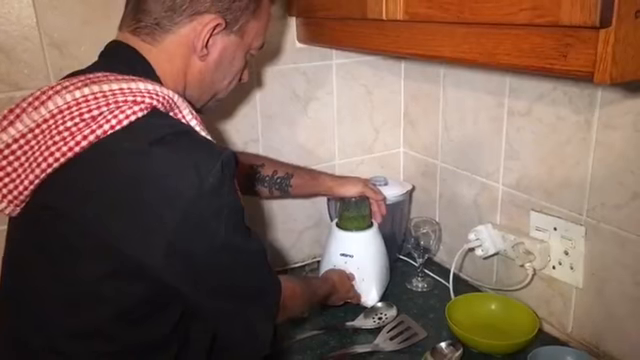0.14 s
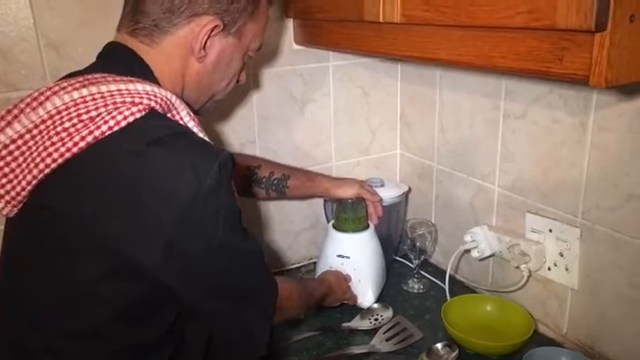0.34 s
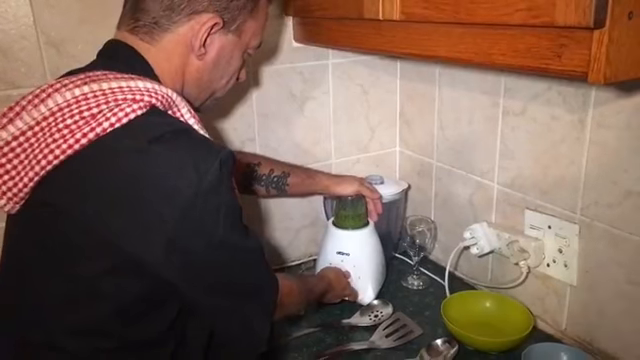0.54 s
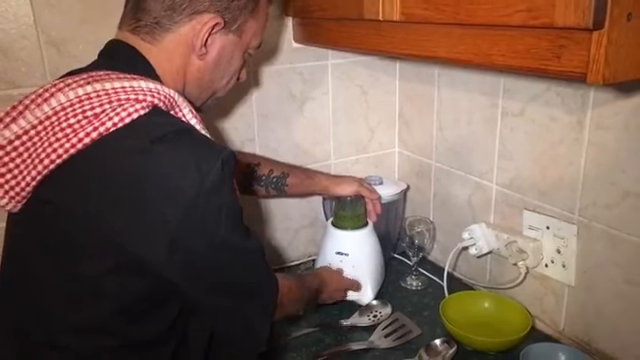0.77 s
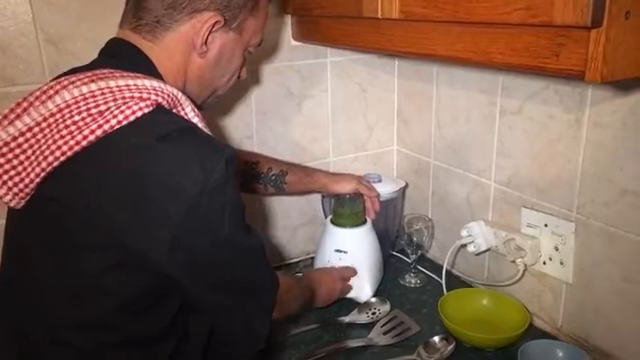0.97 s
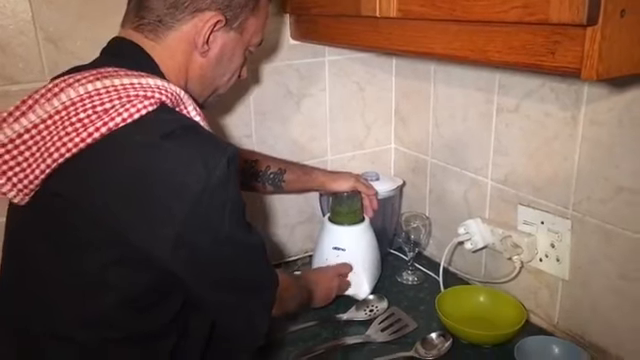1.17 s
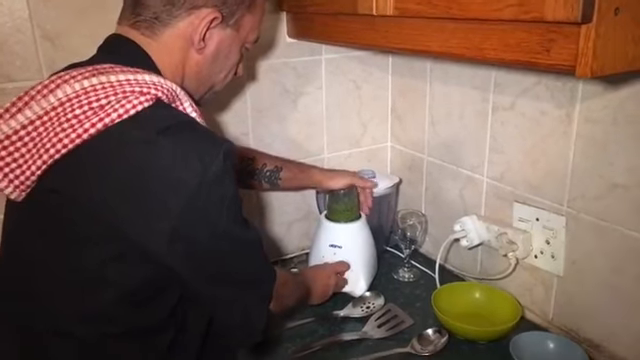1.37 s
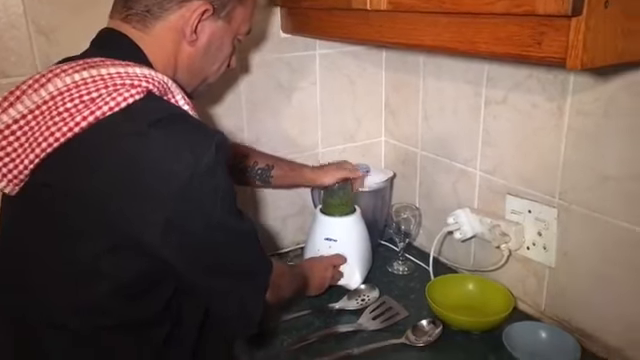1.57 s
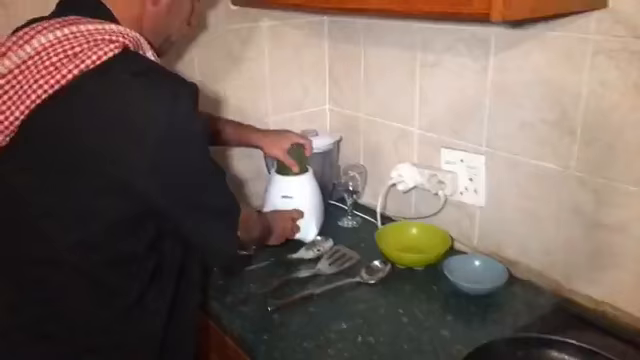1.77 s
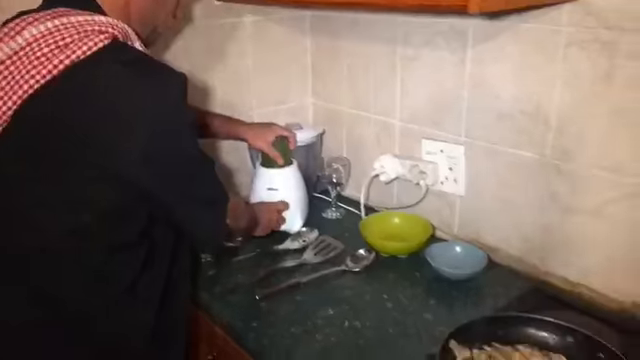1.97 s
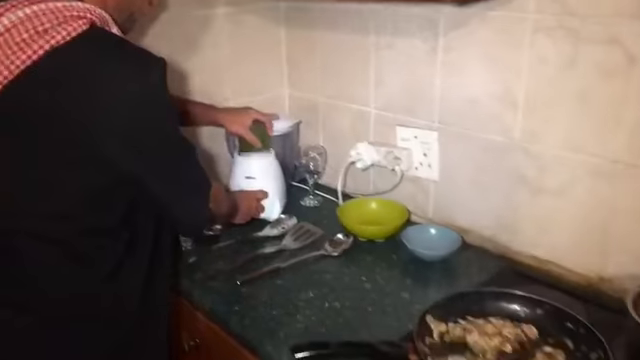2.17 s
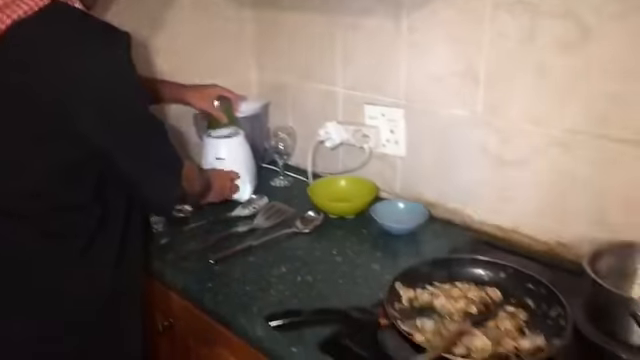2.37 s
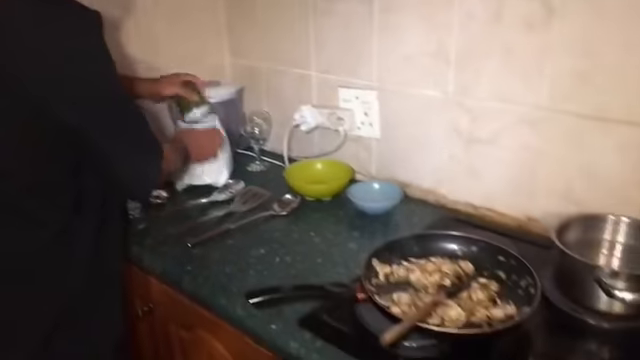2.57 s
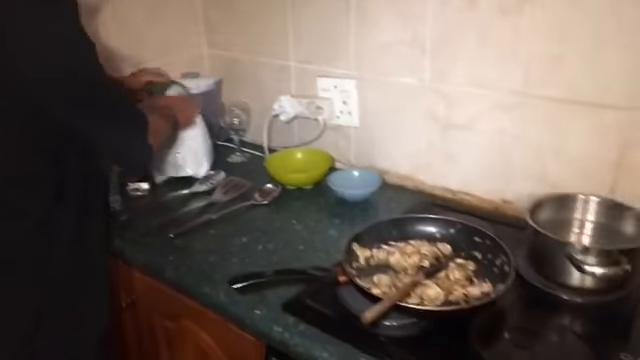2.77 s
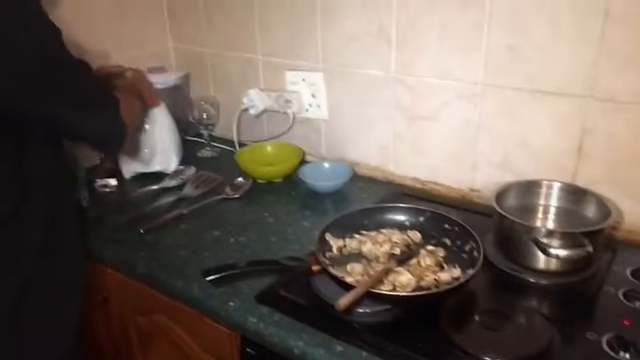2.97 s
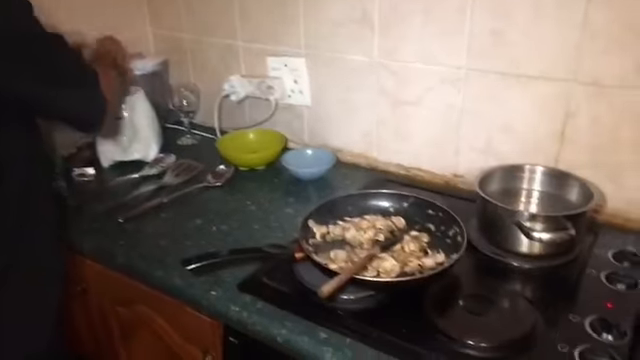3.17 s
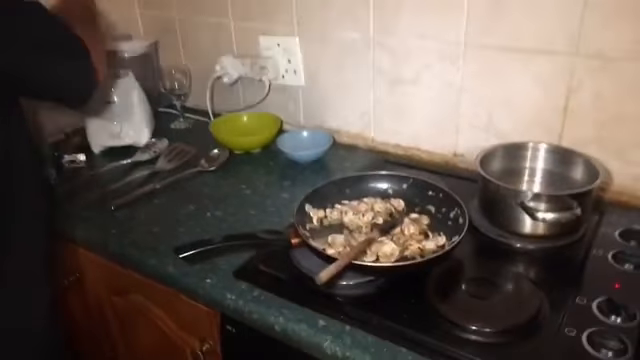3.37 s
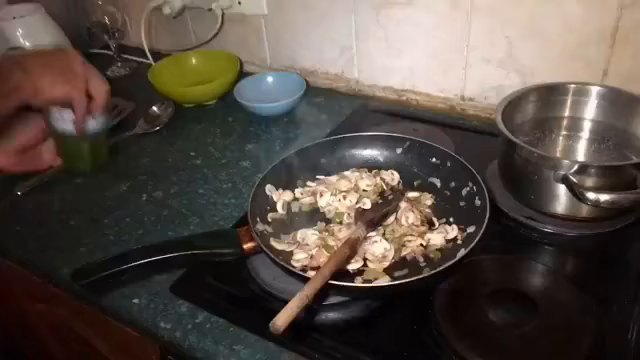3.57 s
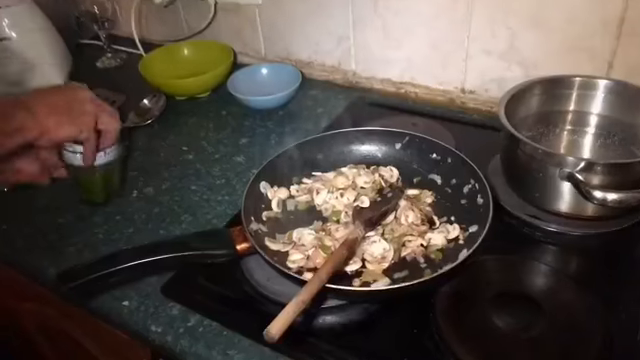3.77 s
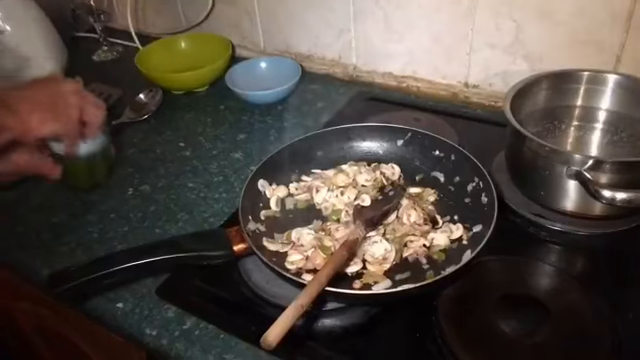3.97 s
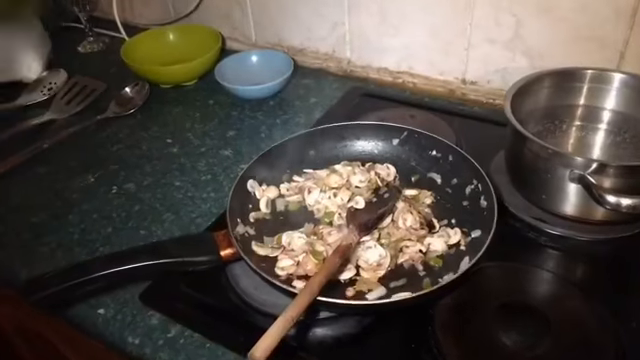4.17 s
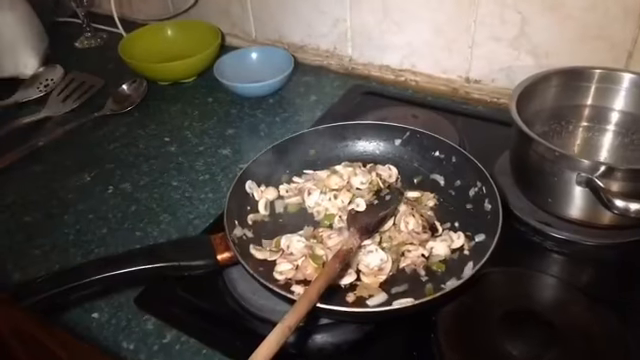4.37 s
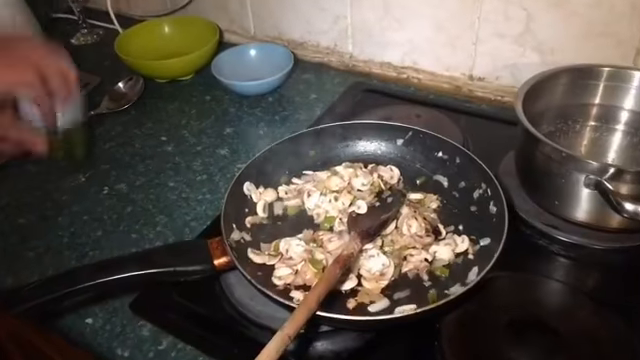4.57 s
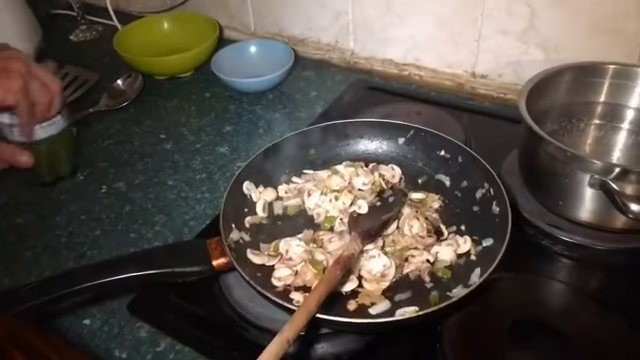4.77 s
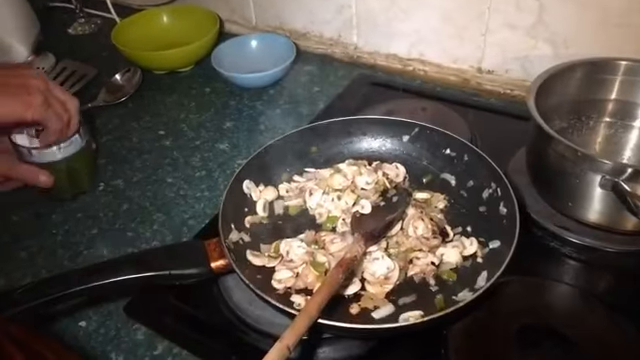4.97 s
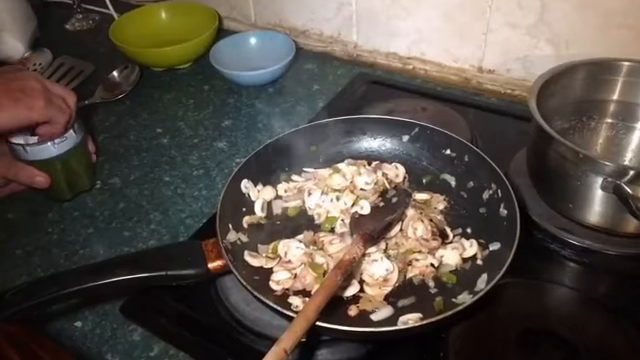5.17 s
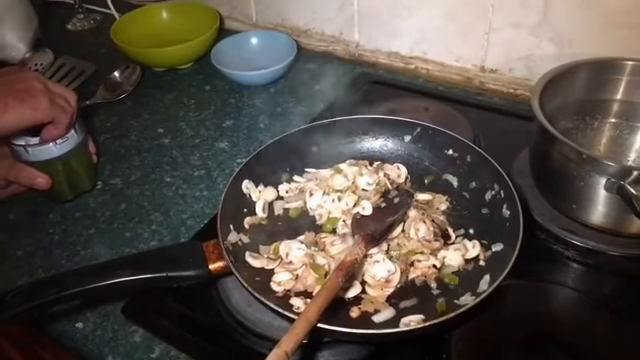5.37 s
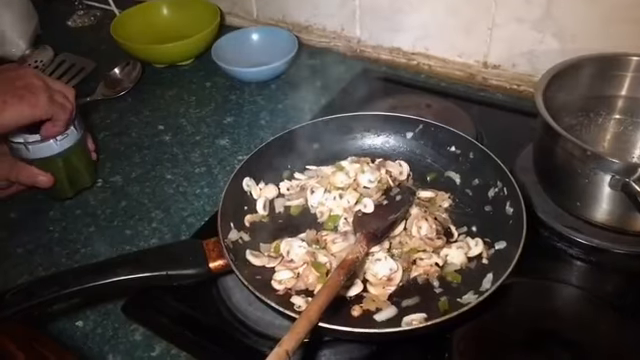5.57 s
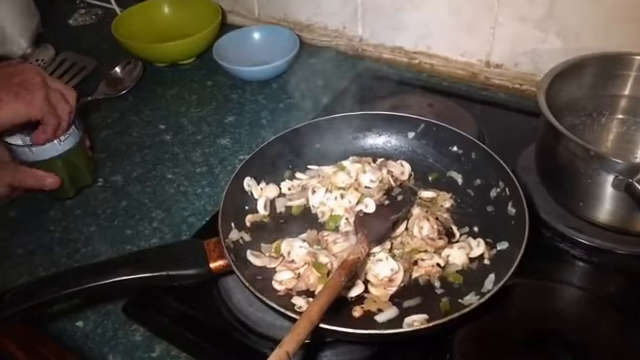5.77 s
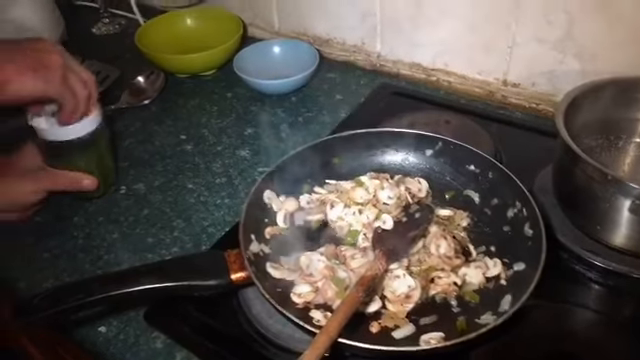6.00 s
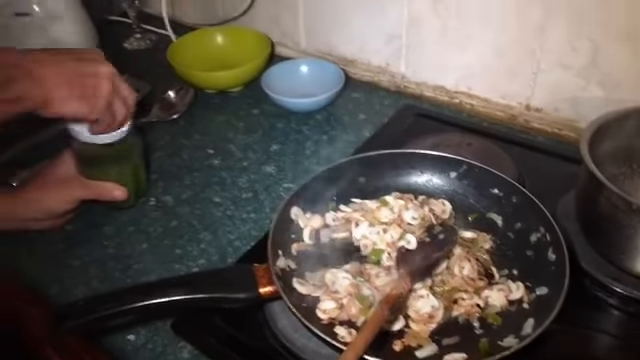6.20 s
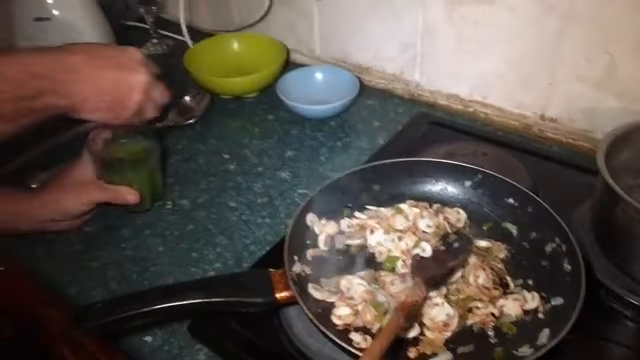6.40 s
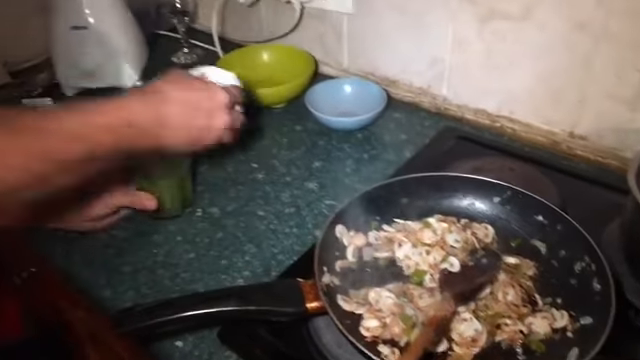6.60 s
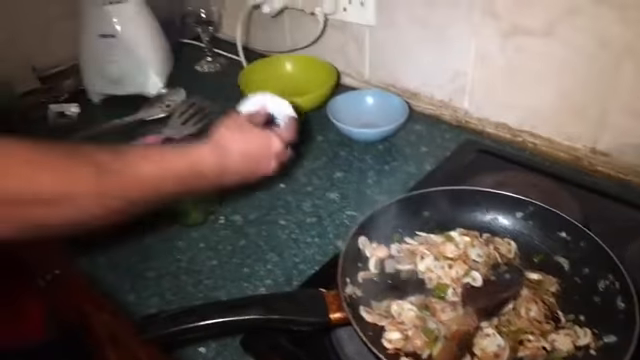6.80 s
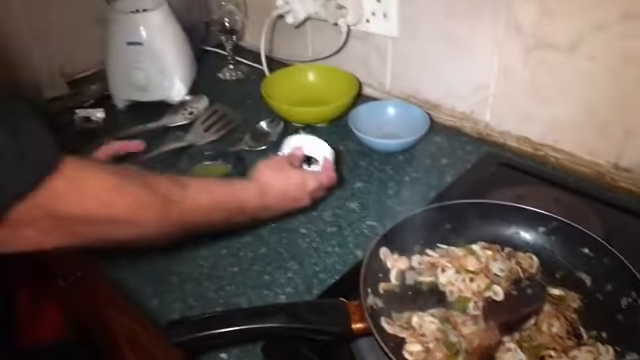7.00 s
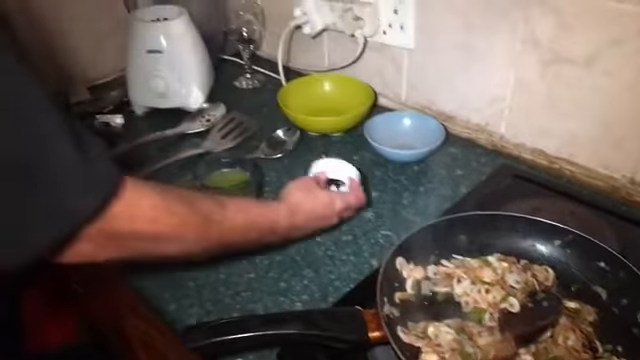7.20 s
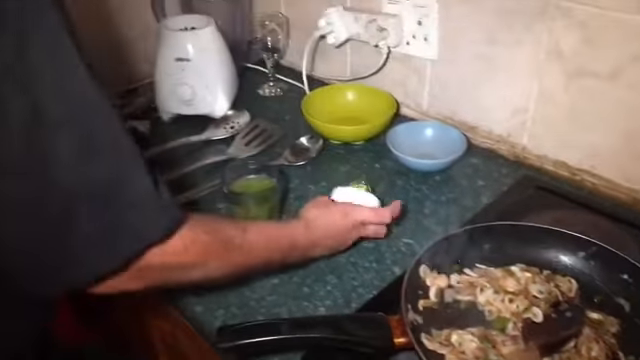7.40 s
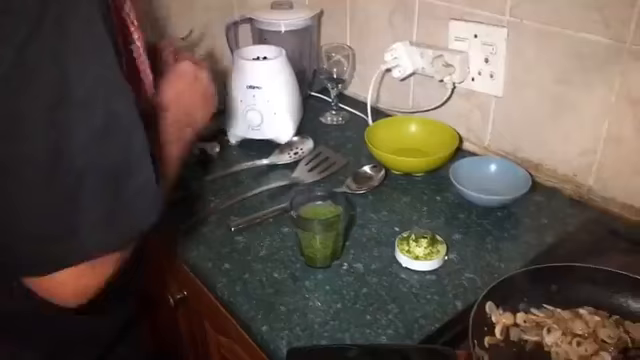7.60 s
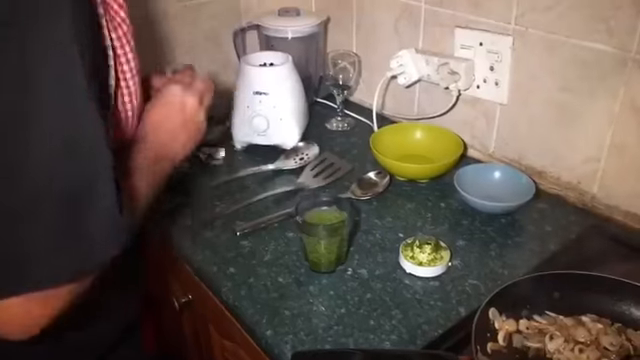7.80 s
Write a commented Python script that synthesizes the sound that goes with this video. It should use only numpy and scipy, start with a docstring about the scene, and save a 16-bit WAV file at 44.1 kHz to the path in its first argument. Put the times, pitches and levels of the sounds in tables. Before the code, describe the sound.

In a tiled home kitchen, a small blender winds down in the first second, its hum sinking under rough slurry noise. Soft steady frying and faint mains hum remain. Light plastic taps follow, then two jar knocks on the stone counter, cap creaks, a sharp metallic jangle as the cap comes off, and a final plastic tap. A handheld microphone rumbles and bumps throughout.

```python
"""Blender stopping in a kitchen

A small blender coasts to a stop on a stone counter: a slowing hum under the roar of knocked slurry.
Food sizzles softly in a pan as dense grains melted into noise, over room tone and a faint mains hum.
A glass jar lands as struck modes, plastic parts tap as its cap is unscrewed, and its steel blades jangle
as ticks and pings. A hand-held camera with one microphone rumbles as it is moved: low noise and bumps."""
import sys
import numpy as np
from scipy import signal
from scipy.fft import rfft, irfft
from scipy.io import wavfile
from scipy.ndimage import uniform_filter1d

SR = 44100
rng = np.random.default_rng(int(sys.argv[2]) if len(sys.argv) > 2 else 0)


def master(y):
    """Save y as 16-bit WAV."""
    cut = np.clip(np.atleast_2d(y).T, -1, 1)
    pcm = np.round(cut * 32767)  # scale
    wavfile.write(sys.argv[1], SR, pcm.astype(np.int16))


def rack_gain(trim_db):
    """Turn a fader trim in dB into the linear factor to multiply a signal by."""
    fader = np.asarray(trim_db, float)
    return 10 ** (fader / 20)


N = 346185
T = np.arange(N) / SR

# Spectrum of the room tone. Each row: frequency in Hz, relative density in dB per Hz.
ROOM_TONE_SPECTRUM = [(15, -37), (25, 9), (54, -8.5), (106, -27), (124, -55), (155, -17), (174, -38),
                      (250, -7), (381, -14), (536, -9.5), (3000, -28), (3900, -46), (6600, -120)]
# Appliance hum. Each row: frequency in Hz, mean level in dB.
HUM_TONES = [(50, -68), (100, -62), (150.5, -67.5), (260, -70.5), (300, -75), (436, -67)]
# Camera moved in the hand. Each row: middle in seconds, half length in seconds, sway level in dB,
# quickness as the dB gained from sway to thump.
CAMERA_MOVES = [(0, 0.049, -27, 3.5), (0.188, 0.056, -35, 5.5), (0.292, 0.046, -40, 0.5),
                (.42, .06, -47, -4), (0.106, 0.037, -51.5, 17.5), (.52, 0.026, -56, 7.5),
                (0.647, 0.17, -50, 4), (0.92, 0.047, -59, 6), (1.377, 0.053, -45, -16),
                (1.943, 0.1, -67, -5), (2.21, 0.052, -61, -2), (2.495, 0.048, -50, 1),
                (2.577, 0.033, -43.5, -4), (2.72, 0.067, -45, 0), (2.803, 0.049, -41, -5),
                (2.902, 0.074, -34.5, -3.5), (3.03, 0.03, -43, -1.5), (3.154, 0.036, -46, -13),
                (3.293, 0.028, -39, -11.5), (3.536, 0.018, -39.5, -2), (3.703, .04, -49, 3),
                (3.76, .04, -44, -9), (3.85, .06, -31, -30), (4.029, 0.023, -59, 17.5),
                (4.28, 0.13, -53, -4), (4.513, 0.012, -42, -1), (4.65, 0.048, -38, 7.5),
                (4.764, 0.091, -33, 8), (4.852, 0.037, -26, -13), (4.915, 0.059, -40.5, 10.5),
                (5.016, 0.047, -35.5, 3.5), (5.22, 0.036, -46, -8), (5.31, .04, -45.5, -2),
                (6.228, 0.019, -52.5, 16), (6.284, 0.042, -58, 9), (6.772, 0.039, -37, -14),
                (7.11, 0.041, -42.5, -13), (7.258, 0.038, -33.5, -9), (7.316, 0.023, -30.5, -25),
                (7.4, 0.047, -42.5, -14), (7.584, .04, -50, -5), (7.721, 0.025, -32, -8),
                (7.788, 0.032, -40, 5), (7.85, 0.016, -36, 7.5)]
# A camera held still. The entries: mean sway, thump and flutter levels in dB.
STILL_HAND_DB = -56.5, -62, -65.5
# Bumps of the camera body. Each row: start in seconds, level in dB, starting pitch in Hz, t60 in seconds.
CAMERA_BUMPS = [(2.361, -18.5, 91, 0.15), (6.219, -37.5, 160, 0.13), (6.669, -12.5, 91.5, 0.2)]
# Frying as the microphone wanders nearer and away. Each row: time in seconds, level in dB.
SIZZLE_LEVEL = [(1, -48.5), (2.8, -49.5), (3.65, -48.5), (4.13, -46.5), (4.45, -48), (4.85, -47.5),
                (6.2, -47), (7.0, -48.5), (7.85, -46.5)]
# Spectrum of the frying. Each row: frequency in Hz, relative density in dB per Hz.
PAN_SPECTRUM = [(710, -19), (1200, -10), (1380, -19), (1890, -15), (3110, -14), (3580, -10.5), (4030, -9.5),
                (5450, -7.5), (8780, -1), (10400, -2.5), (12000, -2.5), (15100, -7), (15900, -8)]
# Loudest spits of fat. Each row: start in seconds, starting level in dB, centre in Hz.
FAT_SPITS = [(2.285, -51, 4530), (2.507, -57, 4000), (3.824, -47, 4030), (7.118, -44, 9000),
             (7.198, -36, 10700), (7.207, -42, 8800), (7.295, -40.5, 4940), (7.304, -51, 3470)]
# Plastic parts tapping and creaking. Each row: start in seconds, level in dB, pitch in Hz,
# t60 of the ring in seconds, rough part in dB.
PLASTIC_TAPS = [(.515, -35, 802, 0.14, -2), (1.42, -42, 310, 0.076, 2.5), (1.549, -44, 330, 0.067, -15),
                (1.685, -44, 315, 0.19, -10), (1.849, -42.5, 322, 0.1, -1), (1.866, -53.5, 1150, 0.15, 13),
                (1.872, -51, 2383, 0.13, 8), (2.791, -52.5, 1800, 0.017, 6), (3.548, -49, 883, 0.083, -2),
                (5.205, -45, 664, 0.066, -18), (5.262, -32.5, 766, 0.13, -15), (5.28, -37, 730, .05, -8),
                (5.312, -46, 1530, 0.12, -4), (5.33, -31.5, 845, 0.064, -17),
                (5.332, -40, 1123, 0.063, -18), (5.336, -33, 550, 0.04, -3.5),
                (5.365, -40.5, 880, 0.11, -5), (5.4, -57, 1600, 0.22, -6), (5.63, -50.5, 424, 0.6, -8),
                (6.213, -42.5, 4020, 0.036, 0), (6.216, -51, 1100, .06, 4), (6.255, -56, 1200, .2, 1),
                (6.615, -35.5, 916, 0.037, -12), (6.668, -32, 494, 0.023, 7), (6.69, -28, 725, 0.058, 3),
                (6.716, -33, 2340, 0.037, 2), (7.836, -22, 877, 0.025, -10.5)]
# Hard edges clicking. Each row: start in seconds, level in dB.
EDGE_CLICKS = [(1.421, -35.5), (1.869, -52), (2.79, -42), (5.312, -33), (5.328, -27.5), (6.213, -39),
               (7.836, -37.5)]
# Jar set on the counter. Each row: start in seconds, level in dB, hardness as treble tilt in dB an octave,
# thud in dB, crack in dB.
JAR_KNOCKS = [(4.0035, -12, -12, -7.5, -17.5), (4.836, -10, -3, -6, -6.5)]
# Ringing modes of jar and counter. Each row: frequency in Hz, relative level in dB, t60 in seconds.
JAR_MODES = [(114, -1, 0.055), (537, -3.5, 0.028), (877, -11, 0.016), (1100, -6.5, 0.047),
             (1400, -7.5, 0.039), (1800, -31, 0.02), (2290, -5, 0.015), (2770, -23, 0.05), (3400, 3, 0.011),
             (4100, -30, 0.029)]
# The rim lands in several touches. Each row: delay in seconds, relative level in dB.
RIM_TOUCHES = [(0, -35), (.0019, -5.5), (.0038, 3.5), (.0075, -19)]
# Spectrum of the jangling steel. Each row: frequency in Hz, relative density in dB per Hz.
STEEL_SPECTRUM = [(1760, -55), (3000, -21.5), (5700, -10.5), (6650, -4.5), (8610, -4.5), (8910, -3.5),
                  (10500, -7.5), (12000, -2.5), (14800, -2), (15900, -4)]
# Blades shaken in the cap. Each row: peak in seconds, level in dB, rise in dB per second,
# fall in dB per second.
BLADE_SHAKES = [(6.671, -14.5, 1350, 450), (6.715, -26.5, 600, 102), (6.77, -25.5, 800, 152)]
# Clear pings of the blades. Each row: start in seconds, mean level in dB, pitch in Hz, t60 in seconds.
BLADE_PINGS = [(6.655, -32, 9500, .06), (6.67, -22, 9240, .05), (6.676, -20.5, 7660, 0.083),
               (6.678, -22, 14500, .12), (6.686, -25, 9200, .1), (6.767, -23, 6690, 0.084),
               (6.767, -24.5, 9950, 0.089), (6.785, -21, 12500, .06), (6.788, -25, 9160, 0.11),
               (6.788, -33, 8300, .12), (6.812, -26, 9220, .08)]
# Blender coasting. Each row: time in seconds, shaft speed in Hz.
SHAFT_SPEED = [(0, 214), (.18, 165), (.3, 145.2), (.53, 101.2), (.78, 80.1), (1.05, 51.2)]
# Modes of the blender housing. Each row: frequency in Hz, width in Hz, relative level in dB at full speed.
HOUSING_MODES = [(770, 150, -5.5), (845, 31, -5.5), (1100, 510, -3.5), (1900, 37, -5.5), (2113, 106, 5.5),
                 (2400, 85, 0), (2860, 66, -6.5), (4000, 130, -4), (4960, 49, -12), (6370, 140, -6)]
# Spectrum of the roar. Each row: frequency in Hz, relative density in dB per Hz.
ROAR_SPECTRUM = [(88, -34), (150, -14), (314, 5.5), (384, -26), (614, -28), (728, 3), (1360, -5),
                 (2060, -21), (4500, -27), (5850, -52), (9900, -120)]
# Spectrum of the spinning blades' hiss. Each row: frequency in Hz, relative density in dB per Hz.
HISS_SPECTRUM = [(1760, -13), (3000, -3.5), (3310, -3.5), (3940, -2.5), (4690, -3.5), (5100, 0.5),
                 (7430, 1.5), (13600, -6.5), (15900, -9)]
# Lumps caught by the blades. Each row: middle of the surge in seconds, surge in dB.
CAUGHT_LUMPS = [(.01, 0), (.07, 3.5), (.157, 3), (.212, 2), (0.278, 4.5), (.362, 5), (.452, 4),
                (0.529, 10.5), (0.621, 6.5), (.697, 8), (.777, 7), (.85, 0), (.92, 0)]
# Steady offset of the converter. Each row: one channel, as a fraction of full scale.
CONVERTER_OFFSET = [
    [-.0071],
    [-.0088],
]


def noise():
    """White noise of rms 1."""
    return rng.standard_normal(N)


def level(x, db):
    """Scale to an rms level in dB."""
    return x * rack_gain(db) / np.sqrt(np.mean(x ** 2))


def curve(table):
    """Join (seconds, value) rows by straight lines, at every sample."""
    s, value = np.transpose(table)
    return np.interp(T, s, value)


def colour(x, points):
    """Shape by (Hz, dB) points, straight over log frequency; rms 1."""
    hz, db = np.transpose(points)
    f = np.maximum(np.fft.rfftfreq(N, 1 / SR), 1)
    gain_db = np.interp(np.log(f), np.log(hz), db, left=-80, right=-80)
    return level(irfft(rfft(x) * rack_gain(gain_db), N), 0)


def band(x, lo_hz, hi_hz, order=2):
    """Butterworth band-pass."""
    edges_hz = [lo_hz, min(hi_hz, SR / 2.2)]
    return signal.sosfilt(signal.butter(order, edges_hz, "band", fs=SR, output="sos"), x)


def ring(x, hz, t60):
    """One mode; a unit blow rings with amplitude 1."""
    pole = np.exp(2j * np.pi * hz / SR - np.log(1000) / (max(t60, 1e-3) * SR))
    return signal.lfilter([1], [1, -pole], x).imag


def walk(rate):
    """Random levels, a new one every 1 / rate seconds, slewed between; rms 1."""
    k = int(SR / rate)
    held = np.repeat(rng.standard_normal(N // k + 1), k)
    return level(uniform_filter1d(held, k)[:N], 0)


def grains(rate, spread_db):
    """Scattered clicks of either sign, some much bigger than the rest."""
    hits = rng.random(N) < rate / SR
    size_db = spread_db * np.minimum(rng.exponential(size=N), 4)
    return hits * noise() * rack_gain(size_db)


def burst(s, t60):
    """An envelope that starts at s and dies away by 60 dB in t60 seconds."""
    return (T >= s) * np.exp(-np.log(1000) * np.maximum(T - s, 0) / max(t60, 1e-3))


def even(x, s):
    """Noise with its chance swells over s seconds ironed out; rms 1."""
    return level(x / np.sqrt(uniform_filter1d(x ** 2, int(s * SR)) + 1e-12), 0)


def swell(s, db, rise, fall):
    """A level that climbs to db at s and sinks again, straight in dB."""
    return rack_gain(db - np.where(T < s, rise * (s - T), fall * (T - s)))


def room(x):
    """A tiled kitchen's tail: band-limited noise dying away, begun 8 ms after the sound."""
    t60_s, tail_db = 0.47, -15
    t = T[:SR]
    tail = band(rng.standard_normal(SR), 670, 6000, order=1)
    tail = tail * np.exp(-np.log(1000) * t / t60_s) * (t > 0.008)
    return signal.fftconvolve(x, tail / np.sqrt(np.sum(tail ** 2)))[:N] * rack_gain(tail_db)


def kitchen():
    """Room tone as shaped noise, and appliance hum as sines wavering in level and phase."""
    hum = np.zeros(N)
    for hz, db in HUM_TONES:
        waver = (hz / 250) ** 2 * walk(20)  # radians, wider for higher tones
        hum += rack_gain(db + 1.9 * walk(6.9)) * np.sin(2 * np.pi * hz * T + waver)
    room_tone = colour(noise(), ROOM_TONE_SPECTRUM) * rack_gain(-57.5 + walk(5.17))
    return room_tone + np.sqrt(2) * hum


def handling():
    """Low buffeting and bumps straight into the microphone; quicker moves reach higher."""
    sway = even(band(noise(), 18.8, 40.1, order=3), 0.032)
    thump = even(band(noise(), 54.3, 95.3, order=2), 0.0325)
    flutter = even(band(band(noise(), 119, 169, order=1), 74, 343, order=3), 0.0272)
    gains = [rack_gain(db + 3.3 * walk(19)) for db in STILL_HAND_DB]
    for s, half, db, quick_db in CAMERA_MOVES:
        shape = np.exp(-((T - s) / half) ** 2)
        lifts_db = 0, quick_db, 1.8 * quick_db - 13.5  # quickness counts most in the flutter
        gains = [g + rack_gain(db + lift) * shape for g, lift in zip(gains, lifts_db)]
    out = sum(g * x for g, x in zip(gains, (sway, thump, flutter)))
    sag_s = 0.015  # the pitch of a bump has halved after this time
    for s, db, hz, t60 in CAMERA_BUMPS:
        phase = 2 * np.pi * hz * sag_s * np.log1p(np.maximum(T - s, 0) / sag_s)
        onset = np.clip(0.57 + (T - s) / 0.02, 0, 1)  # begins part-way up
        out -= rack_gain(db) * np.sin(phase) * burst(s, t60) * onset
    return out


def frying():
    """Dense bursting steam bubbles melt into a hiss; some spit above it."""
    bubbles = level(grains(2500, 4.2), -7.5) + noise()
    sizzle = colour(bubbles, PAN_SPECTRUM) * rack_gain(curve(SIZZLE_LEVEL) + 0.29 * walk(26))
    spits = np.zeros(N)
    for s, db, hz in FAT_SPITS:
        spit = level(band(bubbles, hz / 1.54, hz * 1.37, order=1), 0)
        spits += rack_gain(db) * spit * burst(s, 0.036)
    return sizzle + spits


def taps():
    """Each tap is a short ring with a rough scuff around it; hard edges add a click."""
    out, rough = np.zeros(N), noise()
    for s, db, hz, t60, rough_db in PLASTIC_TAPS:
        tone = np.sin(2 * np.pi * hz * (T - s)) * burst(s, t60)
        scuff = level(band(rough, hz / 1.7, hz * 1.7, order=1), -6)
        out += rack_gain(db) * (tone + scuff * rack_gain(rough_db) * burst(s, 0.078))
    clicks = sum(rack_gain(db) * burst(s, 0.03) for s, db in EDGE_CLICKS)
    return out + band(noise(), 3900, 22000, order=1) * clicks


def jar():
    """The rim's touches ring jar and counter; a harder blow rings brighter, its crack set on its own."""
    out = np.zeros(N)
    for s, db, tilt_db, thud_db, crack_db in JAR_KNOCKS:
        touches = sum(rack_gain(g) * (np.arange(N) == int((s + lag) * SR)) for lag, g in RIM_TOUCHES)
        blow = 0.41 * touches + noise() * burst(s, 0.047) / 25
        body = np.zeros(N)
        for hz, mode_db, t60 in JAR_MODES:
            blow_db = thud_db if hz < 200 else tilt_db * np.log2(hz / 528)
            body += rack_gain(mode_db + blow_db) * ring(blow, hz, t60)
        onset = np.clip((T - s) / 0.0014, 0, 1)
        crack_shape = burst(s, 0.051) + 0.15 * burst(s + 0.0054, 0.03)
        crack = band(noise(), 780, 17000, order=1) * crack_shape * onset * rack_gain(crack_db)
        rattle = band(noise(), 500, 870, order=1) * burst(s, 0.11) * onset * rack_gain(-3)
        out += rack_gain(db) * (body + crack + rattle)
    return out


def blades():
    """Loose steel chatters in fast ticks over a plastic scrape; single thin rings stand out."""
    shake = np.max([swell(*row) for row in BLADE_SHAKES], axis=0)
    ticks = noise() + level(grains(4000, 1.5), -7)
    scrape = level(band(ticks, 240, 1900, order=1), -16)
    chatter = colour(ticks, STEEL_SPECTRUM) + scrape
    pings = np.zeros(N)
    for s, db, hz, t60 in BLADE_PINGS:
        pings += rack_gain(db) * np.sin(2 * np.pi * hz * (T - s)) * burst(s, t60)
    return shake * chatter + pings * rack_gain(2 * walk(150))


def shaft_tone(hz, slowing, turn):
    """The shaft hums at its speed and twice that, louder where base or cup resonates."""
    base_db = 10 * np.exp(-(np.log2(hz / 106) / 0.27) ** 2)  # as the shaft passes 106 Hz
    rock_db = 2.5 * np.cos(2 * np.pi * 9.4 * (T - 0.466))  # the base rocks and the tone throbs
    tone_db = -39.5 + 10 * slowing + base_db + rock_db
    cup_db = 16 * np.exp(-(np.log2(2 * hz / 304) / 0.11) ** 2)  # as the second multiple passes 304 Hz
    second = 0.22 * rack_gain(2.887 * walk(12.6) + cup_db) * np.sin(2 * turn)
    return np.sqrt(2) * rack_gain(tone_db) * (np.sin(turn) + second)


def slurry(slowing, turn):
    """Blades knock the slurry against the housing every turn, duller as they slow, under a hiss."""
    slaps = np.diff(turn // (2 * np.pi), prepend=0) * rack_gain(1.2 * noise())  # one a turn
    slosh = noise() * (1 + 0.094 * np.sin(turn)) + level(slaps, -14)
    housing = np.zeros(N)
    for f, width, db in HOUSING_MODES:
        dulling_db = 5.8 * slowing * np.log2(f / 730)
        housing += level(ring(slosh, f, 2.0 / width), db) * rack_gain(dulling_db + 2 * walk(15))
    roar = 0.42 * (colour(slosh, ROAR_SPECTRUM) + housing)
    hiss = colour(noise() * rack_gain(walk(48.1)), HISS_SPECTRUM) * rack_gain(3 + 4 * slowing)
    surge_db = sum(db * np.exp(-((T - s) / 0.023) ** 2) for s, db in CAUGHT_LUMPS)
    return rack_gain(-34 + 8.5 * slowing + surge_db) * (roar + hiss)


def blender():
    """A slowing shaft drives hum and slurry until they stop; a thin whine dies at once."""
    stop_s, fade_s = 0.98, 0.026  # silent at stop_s, after the fade
    hz = curve(SHAFT_SPEED)
    slowing = np.log2(hz / hz[0])  # octaves from full speed, negative
    turn = 2 * np.pi * np.cumsum(hz) / SR
    running = shaft_tone(hz, slowing, turn) + slurry(slowing, turn)
    whine = level(ring(noise(), 5045, 0.091), -24) * burst(0, 0.15)
    return running * np.clip((stop_s - T) / fade_s, 0, 1) + whine


def scene():
    """All sources at one microphone, alike in both channels; only jar and taps get the room's tail."""
    hits = jar() + taps()
    mono = kitchen() + handling() + frying() + hits + room(hits) + blades() + blender()
    return np.array([mono, mono])


def top_cut(x):
    """Nothing passes above the cut-off."""
    return signal.sosfilt(signal.butter(12, 16060, fs=SR, output="sos"), x)


def record(dry):
    """The converter adds a small steady offset to each channel."""
    mix = dry + np.array(CONVERTER_OFFSET)
    return top_cut(mix)


dry = scene()
out = record(dry)
master(out)
```